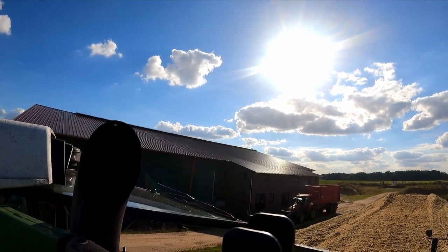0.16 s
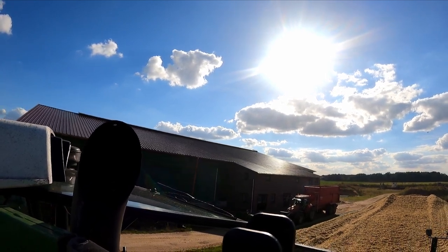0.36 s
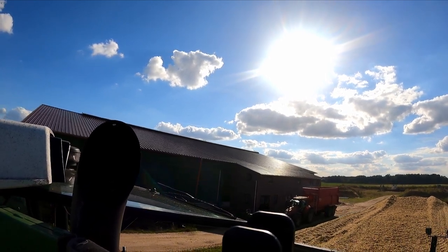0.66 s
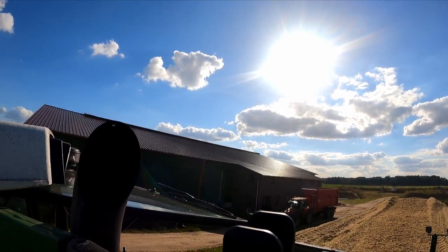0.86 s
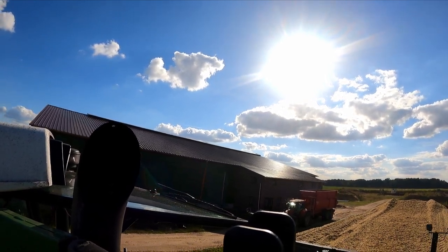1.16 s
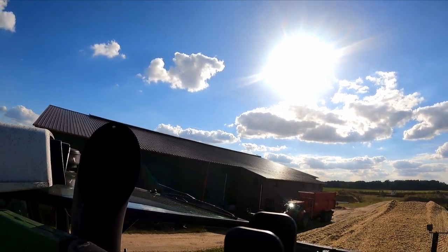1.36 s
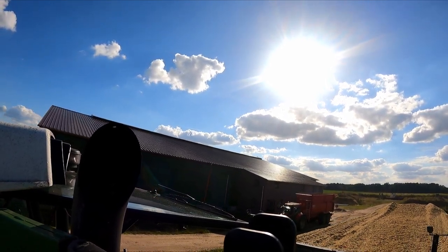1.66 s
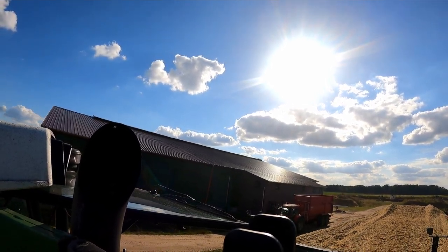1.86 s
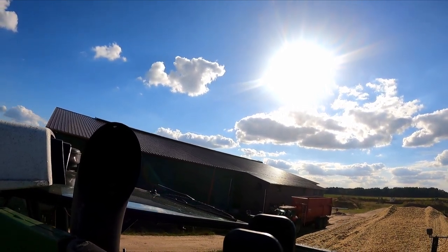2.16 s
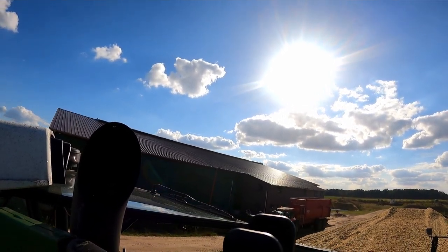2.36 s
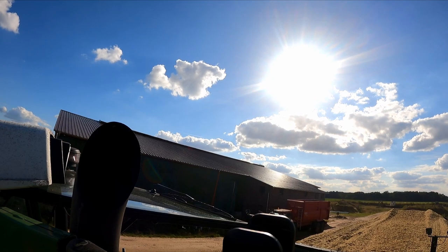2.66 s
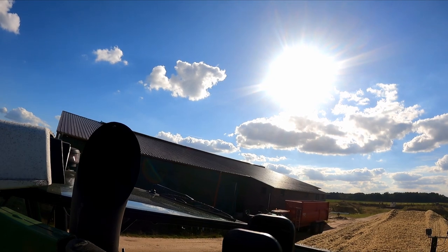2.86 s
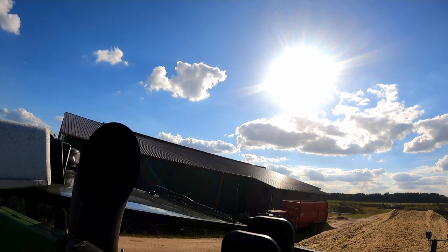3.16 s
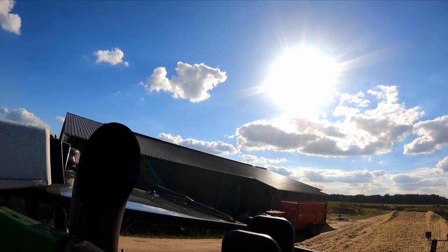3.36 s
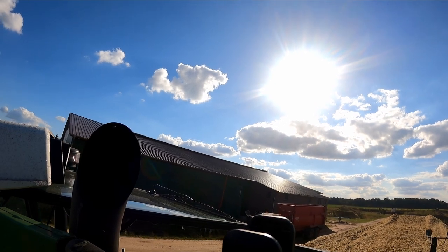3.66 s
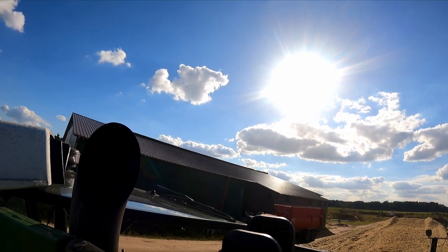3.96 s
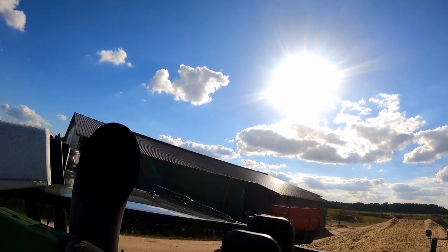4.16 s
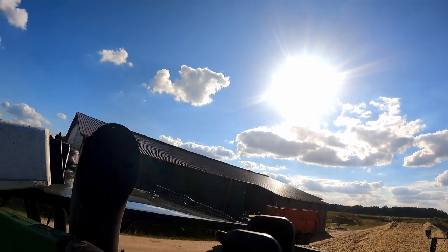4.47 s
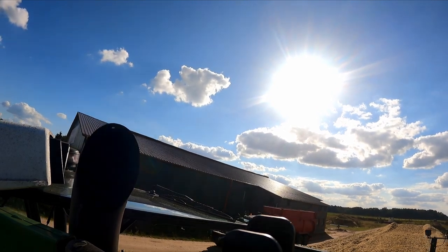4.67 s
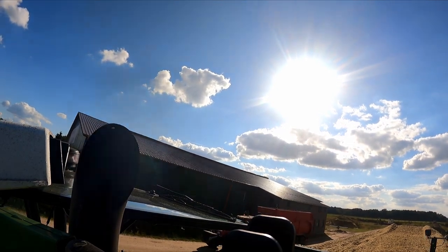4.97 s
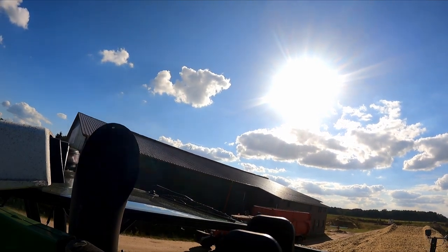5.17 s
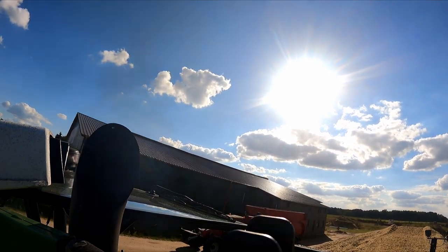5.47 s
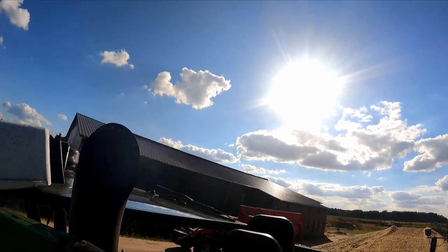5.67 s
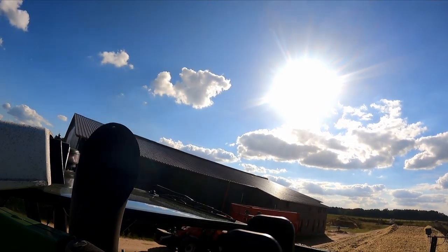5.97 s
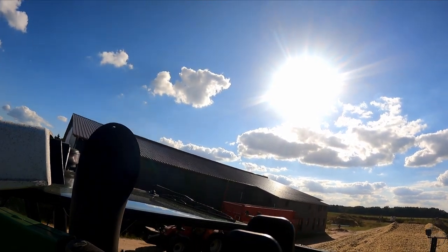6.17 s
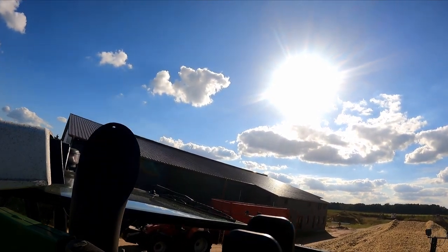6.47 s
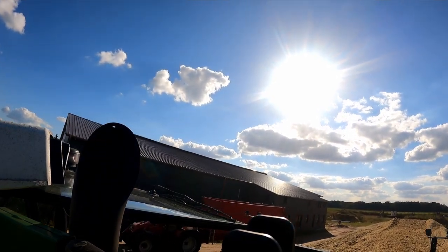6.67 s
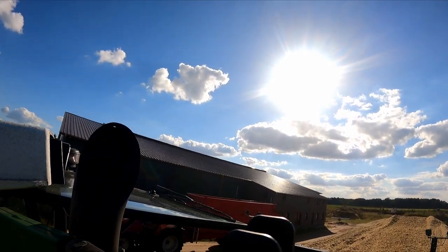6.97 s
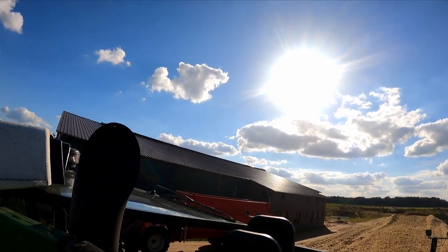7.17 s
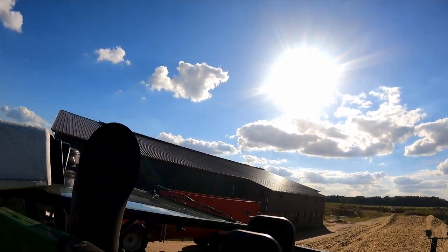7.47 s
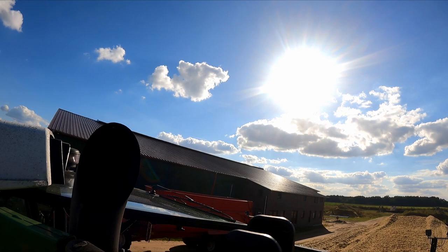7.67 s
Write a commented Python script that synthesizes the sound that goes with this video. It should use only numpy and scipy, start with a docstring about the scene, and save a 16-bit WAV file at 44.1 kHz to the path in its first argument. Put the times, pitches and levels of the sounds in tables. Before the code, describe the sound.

Close diesel tractor roar drops in lurching steps, nearly bogs down halfway, then pulls hard with a rough exhaust rasp as the revs build again.

```python
"""Tractor diesel from the cab

The revs sag unevenly, dip deepest at about 4 s, then build back up under load; five throttle pushes set the effort.
Every firing booms in tuned firing orders, thumps the silencer and tears noise through the ringing exhaust stack.
Behind it lie the clattering rush of the running gear, frame rumble and an intake whoosh, all shaped noise.
Puffs of low noise buffet the microphone ports as the revs climb, and the stereo image narrows almost to mono."""
import sys
import numpy as np
from scipy import signal
from scipy.fft import rfft, irfft, next_fast_len
from scipy.io import wavfile
from scipy.ndimage import map_coordinates

SR = 44100
rng = np.random.default_rng(int(sys.argv[2]) if len(sys.argv) > 2 else 0)


def output_pcm(signal):
    """Save a mono or channel-first signal as 16-bit PCM at the path in sys.argv[1].

    Samples are clipped to [-1, 1] before scaling.
    """
    pcm = np.clip(np.atleast_2d(signal).T, -1, 1) * 32767
    wavfile.write(sys.argv[1], SR, np.round(pcm).astype(np.int16))


N = 345303  # samples

CRUISE_HZ = 60  # firing rate at which the layer levels need no rev correction


def amp(db):
    """Decibels to gain."""
    return 10 ** (np.asarray(db) / 20)


def unit(x):
    """x scaled to rms 1."""
    return x / np.sqrt(np.mean(x ** 2) + 1e-20)


def along(points, hz):
    """(frequency [Hz], value) points read on a log frequency axis."""
    f, v = np.transpose(points)
    return np.interp(np.log(hz + 1), np.log(f + 1), v)


def curves(rows):
    """One value per sample for each column after the time."""
    s, *cols = np.transpose(rows)
    return [np.interp(np.arange(N) / SR, s, c) for c in cols]


def wobble(rate):
    """A smooth random curve, rate knots a second."""
    knots = rng.standard_normal(int(N * rate / SR) + 4)
    return map_coordinates(knots, [np.arange(N) * rate / SR])


def filtered(x, response):
    """x times a response of frequency."""
    m = next_fast_len(N + SR // 2)
    spectrum = rfft(x, m) * response(np.fft.rfftfreq(m, 1 / SR))
    return irfft(spectrum, m)[..., :N]


def ring(x, gain, size=8192):
    """x through the causal filter of the given gain: it rings after a blow, never before."""
    cepstrum = irfft(np.log(np.maximum(gain(np.fft.rfftfreq(size, 1 / SR)), 1e-6)))
    # folding the cepstrum forward in time makes the filter minimum phase
    cepstrum[1:size // 2] *= 2
    cepstrum[size // 2 + 1:] = 0
    response = irfft(np.exp(rfft(cepstrum)))
    return signal.fftconvolve(np.atleast_2d(x), response[None], axes=1)[:, :N]


def colour(points):
    """Gain of frequency for (frequency [Hz], level [dB]) points."""
    return lambda hz: amp(along(points, hz))


def resonances(modes):
    """Gain of frequency for (centre [Hz], half-width [Hz], level [dB]) modes, summed as power."""
    def gain(f):
        return np.sqrt(sum(amp(db) ** 2 / (1 + ((f - hz) / width) ** 2) ** 2 for hz, width, db in modes))
    return gain


# engine speed: (time [s], firing rate [firings/s])
ENGINE_SPEED = [(0.0, 80.9), (0.72, 81.9), (1.48, 68.2), (2.09, 66.0), (2.54, 54.6), (2.85, 55.6),
                (3.12, 65.6), (3.24, 58.8), (3.36, 58.3), (4.08, 31.0), (4.44, 50.3), (4.62, 37.0),
                (4.88, 46.4), (5.55, 56.7), (5.83, 55.9), (6.42, 66.3), (7.12, 72.7), (7.83, 75.3)]


def crank():
    """The shared crankshaft: firing rate and the running count of firings."""
    rate, = curves(ENGINE_SPEED)
    return rate, np.cumsum(rate) / SR - .171


# pushes on the throttle, the engine coasting between them: (time [s], held [s],
# wait until the engine pulls [s], first fuel [0-1], peak effort [0-1], last effort [0-1])
THROTTLE_PUSHES = [(-0.2, 2.39, 0, 1.0, 0.75, 0.08), (2.56, 0.6, 0.26, 0.55, 0.84, 0.8),
                   (3.26, 0.1, 0, 1.0, 0.1, 0.1), (4.02, 0.425, 0.075, 0.9, 1.0, 0.98),
                   (4.58, 3.3, 0, 0.95, 0.98, 0.68)]
FUEL_ON_S, FUEL_OFF_S = 0.035, 0.036  # fuel ramps
BUILD_S, EASING = 0.13, 2.8  # effort's rise time; power of the time held by which it then eases


def throttle():
    """Fuel and effort (0-1): each push feeds fuel at once; effort follows, eases off, and is cut with the fuel."""
    t = np.arange(N) / SR
    ramp = lambda start, length: np.clip((t - start) / length, 0, 1)
    fuel, effort = np.zeros(N), np.zeros(N)
    for s, held, wait, first, peak, last in THROTTLE_PUSHES:
        gate = ramp(s, FUEL_ON_S) * (1 - ramp(s + held, FUEL_OFF_S))
        fuel = fuel + gate * (first + (1 - first) * ramp(s, wait + BUILD_S))
        eased = peak + (last - peak) * ramp(s, held) ** EASING
        effort = effort + gate * ramp(s + wait, BUILD_S) * eased
    return np.clip(fuel, 0, 1), np.clip(effort, 0, 1)


# cylinders in firing order, before each layer scales the unevenness: (relative strength [dB])
CYLINDER_STRENGTH = [0.97, -1.1, 0.78, -0.92]


def firings(turns, lead, jitter, scatter_db, uneven):
    """One impulse per firing, lead seconds before the pressure crest; cylinders differ and no two burns are alike."""
    k = np.arange(int(turns[-1]) + 1)
    chance = rng.standard_normal((len(k), 2))
    at = np.interp(k, turns, np.arange(N)) + (jitter * chance[:, 0] - lead) * SR
    cylinder_db = uneven * np.take(CYLINDER_STRENGTH, k, mode="wrap")
    sizes = amp(cylinder_db + scatter_db * chance[:, 1])
    return np.bincount(np.clip(at, 0, N - 1).astype(int), sizes, N)


def puffs(pulses, rise, t60):
    """Gas flow after each impulse: a quick swell and a slower ebb, times in seconds."""
    t = np.arange(SR // 10) / SR
    puff = (1 - np.exp(-(t / rise) ** 2)) * amp(-60 * t / t60)
    return unit(signal.fftconvolve(pulses, puff)[:N])


# stereo likeness of the noise: (frequency [Hz], left-right correlation [0-1])
STEREO_LIKENESS = [(100, 0.97), (280, 1), (550, 0.96), (1000, 0.94), (3000, 0.91), (6000, 0.86),
                   (10000, 0.81)]


def air():
    """White stereo noise, alike in the bass and less so in the treble."""
    turn = lambda hz: np.arccos(np.clip(along(STEREO_LIKENESS, hz), -1, 1)) / 2
    split = lambda hz: np.array([np.cos(turn(hz)), np.sin(turn(hz))])
    mid, side = filtered(rng.standard_normal((2, N)), split)
    return np.array([mid + side, mid - side])


# warming of the exhaust: (time [s], gas heat [0-1])
GAS_HEAT = [(0, 0), (3, 0.2), (4.3, 0), (5, 0.15), (5.7, 1), (6.3, 0.98)]


def pipe(x, gain, stretch):
    """Sound travels faster in hot gas, so the pipe's resonances rise as it warms."""
    heat = np.clip(curves(GAS_HEAT)[0], 0, 1)
    cool = ring(x, lambda hz: gain(hz * (1 + stretch)))
    hot = ring(x, lambda hz: gain(hz / (1 + stretch)))
    return unit((1 - heat) * cool + heat * hot)


# firing orders 1, 2, 3, before colour and level changes over time:
# (light-throttle level [dB], added by full effort [dB], added when coasting [dB])
ORDER_LEVELS = [(-16, 1.5, -10.5), (-16.5, -3, -8), (-26, 4.5, -8)]
# how pipe and cab pass a firing order: (frequency [Hz], gain [dB])
ORDER_COLOUR = [(32, -11), (45, -3.5), (56, -0.7), (66, 0), (81, -0.24), (95, -5), (110, -4.5), (124, -4.5),
                (137, 1.1), (150, 1.3), (165, -5), (195, -12.5), (222, -1.5), (245, -1)]


def boom(rate, turns, fuel, effort, cab_hz=112, sharpness=0.86, waver_db=0.22):
    """Firing orders swell through resonances; they lead below the cab's broad air resonance and lag above it."""
    out = 0
    for k, (light_db, effort_db, coast_db) in enumerate(ORDER_LEVELS, 1):
        order_hz = k * rate
        db = light_db + effort_db * effort + coast_db * (1 - fuel) + along(ORDER_COLOUR, order_hz)
        lag = np.arctan(sharpness * (order_hz / cab_hz - cab_hz / order_hz))
        tone = np.sqrt(2) * np.cos(2 * np.pi * k * turns - lag)
        out = out + amp(db + waver_db * wobble(32)) * tone
    # unequal cylinders put weak lines between the orders
    return out * (1 + 0.031 * np.cos(np.pi * turns) + 0.019 * np.sin(np.pi * turns / 2))


# silencer's colour when half warm: (frequency [Hz], relative level [dB])
SILENCER_COLOUR = [(120, -38.5), (185, -20), (225, -2), (255, -3.5), (300, 3), (345, -6.5), (400, -9),
                   (480, -11.5), (700, -33), (1050, -20), (2400, -80)]


def thump(turns, db, labour):
    """Each exhaust pulse knocks the silencer's low resonance: cleanly when easy, turbulently when labouring."""
    pulses = firings(turns, lead=.001, jitter=0.00019, scatter_db=1.3, uneven=1.0)
    turbulence = unit(air() * puffs(pulses, rise=0.00054, t60=0.065))
    rough = .2 + .33 * labour
    flow = np.sqrt(1 - rough ** 2) * unit(pulses) + rough * turbulence
    return amp(db) * pipe(flow, colour(SILENCER_COLOUR), stretch=0.038)


# firings that crack harder than their neighbours: (time [s], extra strength [dB])
HARD_CRACKS = [(2.994, 8), (3.091, 8.5), (4.371, 2)]
# stack resonances when half warm: (centre [Hz], half-width [Hz], relative level [dB])
STACK_MODES = [(999, 109, 7), (1733, 41, -7), (2244, 180, -8), (2556, 75, 2), (3063, 212, 5),
               (3790, 150, -6), (4274, 320, -6), (6200, 230, -23.5), (6740, 360, -23.5)]
# extra colour of slow strokes: (frequency [Hz], relative level [dB])
SLOW_CRACK_COLOUR = [(500, -10), (900, 0), (1700, 13), (3100, -1), (4400, 6), (7000, 7), (8500, -8)]
# colour of the jet's hissing edge: (frequency [Hz], relative level [dB])
JET_HISS_COLOUR = [(2500, -8), (4500, 21.5), (5600, 16.5), (7200, 14.5), (8400, 3), (10200, 7),
                   (12000, -2.5), (14000, -22.5)]


def rasp(rate, turns, rasp_db, hiss_db, strain):
    """A jet of gas tears through the stack at every firing and rings its resonances; its edge hisses."""
    t = np.arange(N) / SR
    hard_db = sum(db * (np.abs(t - s) < .009) for s, db in HARD_CRACKS)
    pulses = firings(turns, lead=0.0012, jitter=0.00027, scatter_db=1.3, uneven=0.71) * amp(hard_db)
    # a sharp crack as the valve opens, then the cylinder blows down
    crack = puffs(pulses, rise=0.00098, t60=0.021)
    blowdown = puffs(pulses, rise=0.0027, t60=0.042)
    flow = unit(crack + 0.97 * blowdown)
    jet = (air() + 1.53 * rng.standard_normal(N)) * flow
    # each stroke favours other resonances: four bands waver apart
    edges = [0, 2000, 3500, 5500, SR]  # Hz
    jet = sum(filtered(jet, lambda hz: (hz >= lo) & (hz < hi)) * amp(2.07 * wobble(55))
              for lo, hi in zip(edges, edges[1:]))
    # slow, heavy strokes crack more broadly than fast ones
    fast = pipe(jet, resonances(STACK_MODES), stretch=0.021)
    slow = unit(filtered(fast, colour(SLOW_CRACK_COLOUR)))
    speed = np.clip((rate - 46) / 14, 0, 1)  # 46 to 60 firings a second
    bark = amp(rasp_db) * ((1 - speed) * slow + speed * fast)
    edge = air() * (1 + 1.15 * strain * flow)
    hiss = amp(hiss_db) * unit(ring(edge, colour(JET_HISS_COLOUR)))
    # bark leans left, hiss a little more so
    return bark * amp([[.6], [-.6]]) + hiss * amp([[1.5], [-1.5]])


# colour of the running gear: (frequency [Hz], relative level [dB])
GEAR_COLOUR = [(120, -6), (220, 1.5), (340, -7.5), (405, -5.5), (500, -12), (620, -7), (750, -14),
               (950, -8.5), (2000, -18.5), (2900, -19.5), (3350, -27.5), (4100, -23.5), (7500, -42.5),
               (9500, -60.5)]


def running_gear(turns, db):
    """Fan, gears and injectors: a rush of noise that clatters with the engine."""
    pulses = firings(turns, lead=0.0014, jitter=0.0017, scatter_db=5.5, uneven=3.4)
    clatter = puffs(pulses, rise=0.00041, t60=0.0084)
    noise = air() * (1 + 0.23 * clatter) * amp(0.81 * wobble(45))
    return amp(db) * unit(ring(noise, colour(GEAR_COLOUR))) * amp([[.3], [-.3]])


# colour of the frame's rumble: (frequency [Hz], relative level [dB])
FRAME_COLOUR = [(15, -19.5), (45, 9), (200, 1.5), (300, -6), (450, -13.5), (900, -62.5)]


def chassis(labour):
    """The frame's low noise rumbles more as the engine labours."""
    rumble_db = -30 + 6.9 * labour + 1.0 * wobble(7.7)
    return amp(rumble_db) * unit(ring(air(), colour(FRAME_COLOUR)))


# intake whoosh: (time [s], level [dB])
WHOOSH_LEVEL = [(0, -68), (1.2, -52), (2, -58), (2.4, -42), (3.3, -50), (3.9, -50), (4.3, -62)]
# intake resonances: (centre [Hz], half-width [Hz], relative level [dB])
INTAKE_MODES = [(3870, 190, 7), (4900, 110, 3), (7440, 1200, -18.5)]


def intake():
    """Air whooshes through the intake's resonances, heard most as the revs sag."""
    return amp(curves(WHOOSH_LEVEL)[0]) * unit(ring(air(), resonances(INTAKE_MODES)))


# puffs of air on the ports: (time [s], level before a 3.5 dB cut [dB], left minus right [dB])
PORT_BUFFETS = [(4.336, -28, -9), (4.864, -27, -8.5), (4.999, -29, -7), (5.077, -15.5, -12),
                (5.336, -10.5, -19), (5.471, -11.5, -17), (5.569, -17, -7), (6.844, -14, -6),
                (7.23, -22.5, -1.5), (7.727, -20, 3)]
# colour of a puff: (frequency [Hz], relative level [dB])
BUFFET_COLOUR = [(20, -0.5), (70, 1), (200, -3), (750, -3.5), (1000, -15.5), (1600, -22), (6000, -71)]


def buffets(swell=.009, ebb=0.011):
    """Each puff swells and dies in a few hundredths of a second, its noise unrelated at the two ports."""
    t = np.arange(N) / SR
    shape = lambda u: np.exp(-np.minimum((u / np.where(u < 0, swell, ebb)) ** 2 / 2, 20))
    # the balance only turns the weaker port down
    blow = sum(amp(db - 3.5 + np.minimum([[pan], [-pan]], 0)) * shape(t - s) for s, db, pan in PORT_BUFFETS)
    return blow * unit(ring(rng.standard_normal((2, N)), colour(BUFFET_COLOUR)))


def level(law, rate, fuel, effort):
    """A layer's level in dB from the throttle and the revs."""
    light_db, effort_db, power, coast_db, db_per_hz = law
    throttle_db = light_db + effort_db * effort ** power + coast_db * (1 - fuel)
    return throttle_db + db_per_hz * (rate - CRUISE_HZ)


# layer levels at the cruise rate, before changes over time: (light-throttle level [dB], added by full
# effort [dB], power of effort [-], added when coasting [dB], slope above cruise [dB per firing/s])
THUMP_LEVEL = (-37, 17, 1.5, -13, 0.03)
RASP_LEVEL = (-46.5, 21, 2, 3.5, -0.1)
GEAR_LEVEL = (-29, 3, 0.85, -1.44, 0.0309)
HISS_LEVEL = (-49, 2, 3, -2.5, 0.0236)
# level changes over time; boom and running gear ease down, treble hiss falls away sharply after 5.3 s:
# (time [s], boom [dB], running gear [dB], treble hiss [dB])
LEVEL_CHANGES = [(0, 2.5, 1, -2), (1.1, 0, 1, 1.5), (3, 1.5, 1.5, -2.5), (5.3, -0.6, -2, 1.5),
                 (5.9, -1, -2, -19.5), (6.5, -0.2, -2.5, -20), (7.8, -1.67, -6.5, -31)]
# the gas turns turbulent above this effort (0-1) and below this firing rate (Hz)
CALM_EFFORT, SMOOTH_HZ = 0.45, 80
LUG_GROWTH = 1.5  # how strongly lugging roughens the thump


def scene():
    """One crankshaft times the firings, the throttle sets levels, and hard work at low revs roughens the exhaust."""
    rate, turns = crank()
    fuel, effort = throttle()
    laws = (THUMP_LEVEL, RASP_LEVEL, GEAR_LEVEL, HISS_LEVEL)
    thump_db, rasp_db, gear_db, hiss_db = [level(law, rate, fuel, effort) for law in laws]
    boom_change, gear_change, hiss_change = curves(LEVEL_CHANGES)
    strain = np.clip((effort - CALM_EFFORT) / (1 - CALM_EFFORT), 0, 1)
    lugging = strain * np.clip((SMOOTH_HZ - rate) / (SMOOTH_HZ - CRUISE_HZ), 0, 1)
    exhaust = amp(boom_change) * boom(rate, turns, fuel, effort)
    exhaust = exhaust + thump(turns, thump_db, LUG_GROWTH * lugging)
    exhaust = exhaust + rasp(rate, turns, rasp_db, hiss_db + hiss_change, strain)
    machinery = running_gear(turns, gear_db + gear_change) + chassis(lugging) + intake()
    return exhaust + machinery + buffets()


# phase between the microphone ports: (frequency [Hz], lead of the left port [rad])
PORT_PHASE = [(70, 0.015), (400, -0.0055), (1100, -0.066), (2300, -.36), (4500, -0.16), (10000, -.03)]
# stereo image: (time [s], width [0-1])
STEREO_WIDTH = [(0, 1), (5.45, 1), (5.8, 0.58), (6.2, 0.01)]
TOP_HZ = 14300  # band limit


def record(dry):
    """The ports differ slightly in phase, the image closes almost to mono, and nothing passes the band limit."""
    left, right = filtered(dry, lambda hz: np.exp(.5j * np.array([[1], [-1]]) * along(PORT_PHASE, hz)))
    mid = (left + right) / 2
    side = (left - right) / 2 * np.clip(curves(STEREO_WIDTH)[0], 0, 1)
    return filtered(np.array([mid + side, mid - side]), lambda hz: hz < TOP_HZ)


dry = scene()
out = record(dry)
output_pcm(out)
```